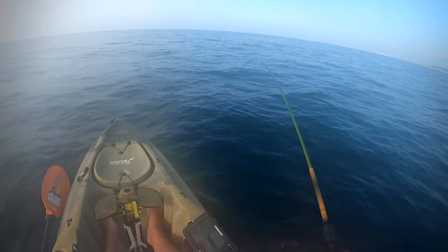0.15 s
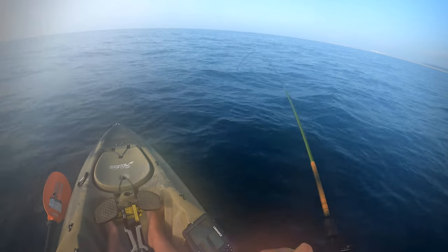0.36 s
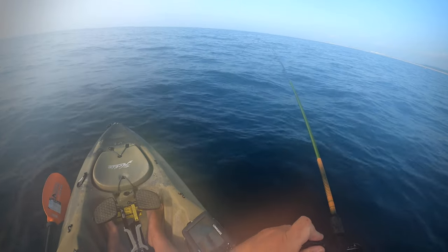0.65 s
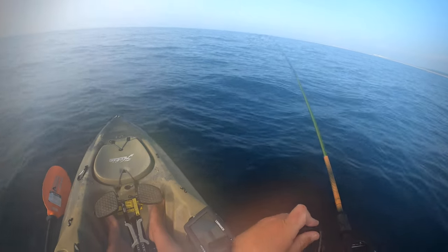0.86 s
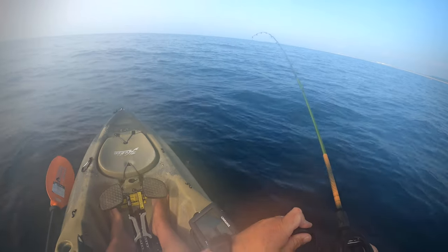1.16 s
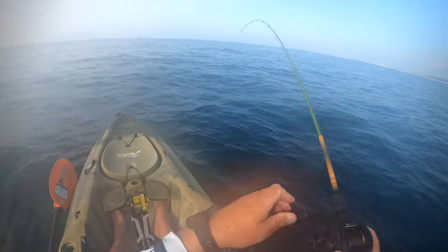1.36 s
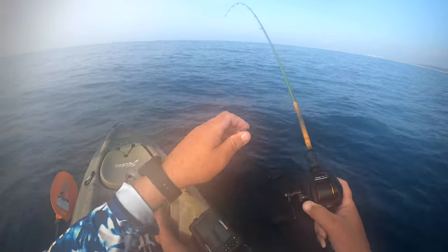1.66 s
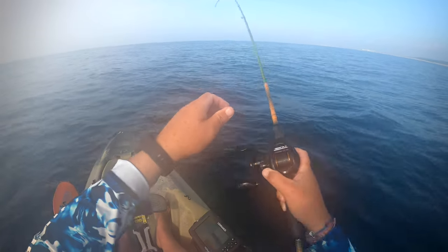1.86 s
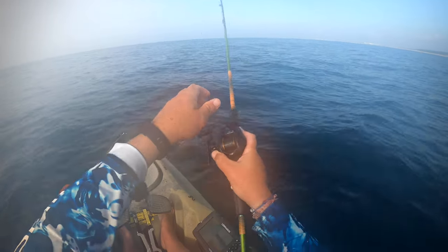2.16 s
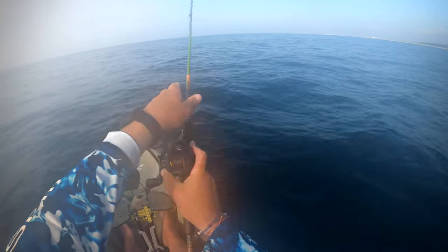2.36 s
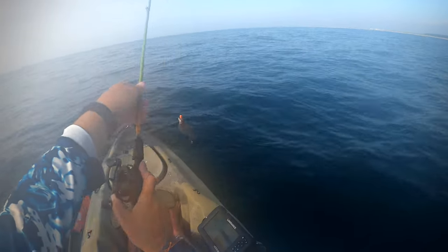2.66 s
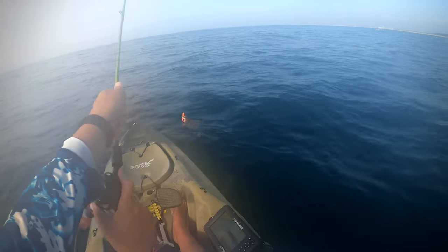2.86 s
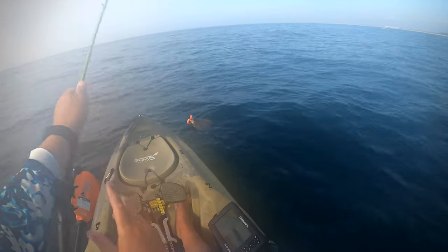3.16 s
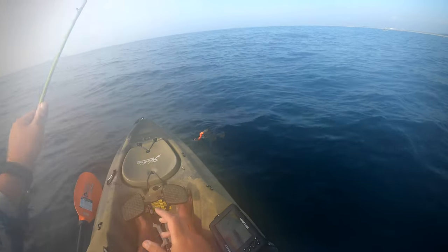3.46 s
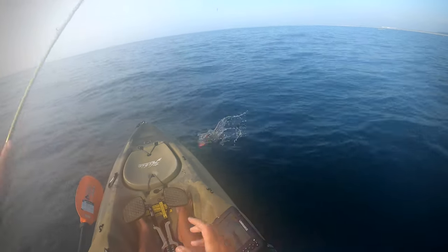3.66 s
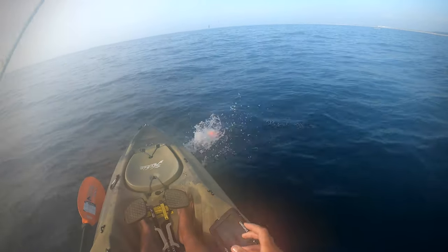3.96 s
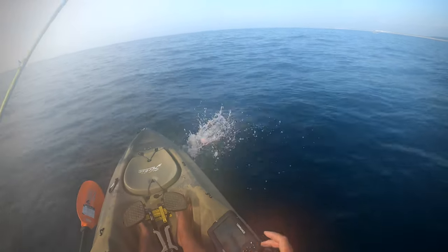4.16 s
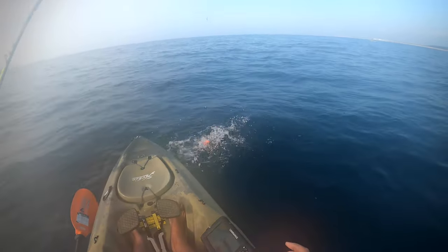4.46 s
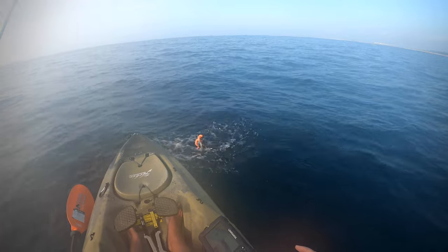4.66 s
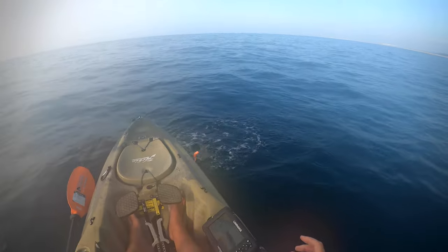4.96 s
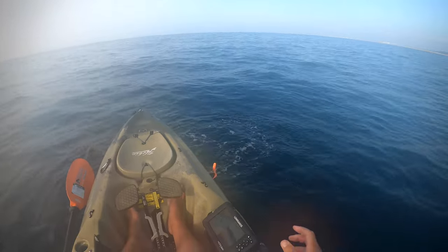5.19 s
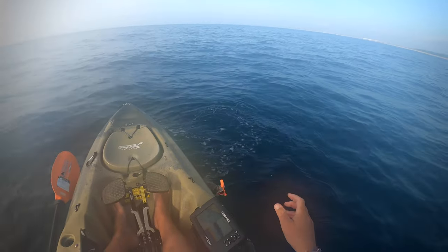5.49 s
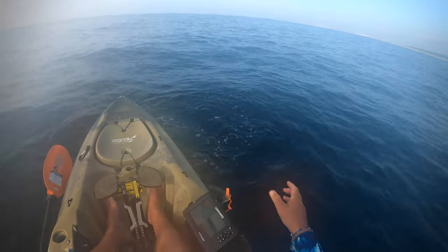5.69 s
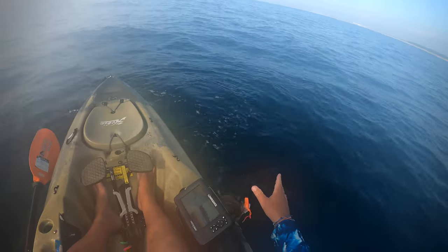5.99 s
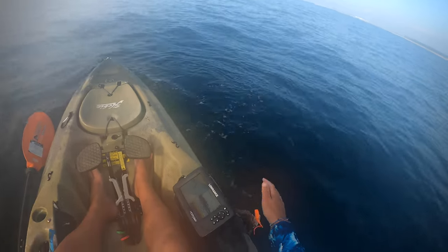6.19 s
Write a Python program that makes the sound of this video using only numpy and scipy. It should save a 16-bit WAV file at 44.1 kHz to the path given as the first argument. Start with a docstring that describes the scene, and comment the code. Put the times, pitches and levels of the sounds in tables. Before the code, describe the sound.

Reel whirr, rod ticks and hollow kayak knocks give way to a bubbling, spraying fish splash, then scattered plops, over a distant engine-like drone.

```python
"""On the water in a kayak: an angler winds in, lays the rod aside, and a hooked fish thrashes at the surface.
The reel whirrs as noise in its body resonances; ticks and hull knocks are struck modes that ring and die.
The splash is swelling, ringing bubbles under a noisy spray, then late drops and small drips.
A far engine-like rumble throbs because its hum tones beat; water, sleeves and light air add soft noise.
Two close microphone ports hear it all."""
import sys
import numpy as np
from scipy import signal
from scipy.fft import rfft, irfft, next_fast_len
from scipy.io import wavfile
from scipy.ndimage import uniform_filter1d

SR = 44100
rng = np.random.default_rng(int(sys.argv[2]) if len(sys.argv) > 2 else 0)


def wav_out(sig):
    """Save sig, one row per channel (or a flat mono array), as 16-bit PCM at SR to the path in sys.argv[1]."""
    wavfile.write(sys.argv[1], SR, np.round(np.clip(np.atleast_2d(sig).T, -1, 1) * 32767).astype(np.int16))


N = 279285

# Steady hum tones: pitch_hz, level_db (against the rumble noise), in_step_s (when in step with the first)
HUM_TONES = [(76.03, -2, 3.39), (72.91, -8, 3.402), (74.25, -12, 3.437), (70.9, -11, 3.383),
             (71.25, -11.5, 3.393), (145.8, -14, 3.39), (152.06, -16, 3.39), (94.8, -17, 3.39)]
# Far rumble over time: time_s, level_db
RUMBLE_LEVEL = [(0.0, -26.5), (1.23, -26), (2.4, -28), (3.33, -24), (3.6, -24.5), (4.05, -29.5),
                (4.2, -30.5), (4.5, -30), (4.83, -24.5), (5.15, -28), (5.6, -25), (6.33, -25)]
# Spectrum of the rumble noise: pitch_hz, level_db (per Hz)
RUMBLE_SPECTRUM = [(26, -40.5), (45, -10.5), (59, -6), (81, -9), (102, -6.5), (150, -7), (183, -11),
                   (230, -14), (254, -16.5), (288, -16.5), (512, -31), (595, -40), (900, -70), (1170, -94),
                   (1980, -120)]
# Soft wash of water round the hull: time_s, level_db
RUSTLE_LEVEL = [(0.0, -47), (0.6, -53.5), (0.95, -47), (1.12, -54), (1.36, -56.5), (1.5, -55), (1.8, -52.5),
                (2.1, -51), (2.4, -54.5), (2.5, -53.5), (2.62, -47.5), (2.8, -54), (2.98, -51.5),
                (3.14, -50.5), (3.2, -48), (3.55, -48), (4.8, -50.5), (4.92, -52), (5.5, -48.5),
                (5.83, -46), (6.33, -51)]
# Spectrum of the wash: pitch_hz, level_db (per Hz)
RUSTLE_SPECTRUM = [(350, -11), (600, -7), (961, -15), (1010, -6.5), (1090, -10.5), (1370, -10.5),
                   (1420, -11), (2020, -24.5), (4540, -41), (10000, -48.5), (13000, -72), (22000, -120)]
# Turns of the crank: start_s, end_s, level_db (at the start), sag_db_per_s (below zero it grows)
CRANK_TURNS = [(-.1, .45, -39.5, 6.5), (.47, .76, -55.5, -18), (.77, 1.13, -43.5, 33.5),
               (6.17, 6.4, -56, -10)]
# Resonances of the reel body: pitch_hz, width_hz, level_db
REEL_RESONANCES = [(1030, 830, -7), (1420, 300, 0), (1830, 420, -5), (2850, 360, -2.5), (3310, 410, -5),
                   (4100, 270, -16)]
# Gusts of light air on the ports: peak_s, peak_db, left_over_right_db
GUSTS = [(.48, -37, -2), (2.109, -20, 11), (2.33, -29, 5.5), (2.411, -22.5, 6), (2.8, -31, 3),
         (4.6, -40.5, -5), (5.62, -32, -5), (6.33, -38, -2)]
# Sleeves brushing as the arms move: peak_s, peak_db, width_s (rise and fall time)
SLEEVE_BRUSHES = [(.12, -49.5, 0.23), (0.84, -58, 0.072), (1.05, -67, 0.061), (1.63, -64, 0.16),
                  (1.873, -48, 0.026), (2.261, -65, 0.15), (2.62, -59.5, 0.085), (3.04, -53, 0.098),
                  (3.28, -59.5, 0.051), (3.5, -49.5, 0.13)]
# Spectrum of the cloth: pitch_hz, level_db (per Hz)
SLEEVE_SPECTRUM = [(900, -28.5), (1600, 4), (2800, -1), (4200, -6), (6500, -9.5), (9000, -15.5),
                   (11000, -33), (15000, -51)]
# Bubbles that whistle upward as they reach the surface: start_s, peak_db, start_hz, end_hz, length_s
CHIRP_BUBBLES = [(0.169, -33.5, 438, 452, .06), (3.86, -22, 780, 1156, 0.024),
                 (4.099, -18, 780, 1200, 0.024), (4.941, -35, 1760, 1950, 0.027),
                 (5.129, -39, 940, 1410, 0.017), (5.13, -49, 620, 1130, .045),
                 (5.295, -44, 2096, 2180, 0.03), (5.412, -52, 1130, 1460, 0.041)]
# Ticks of reel and rod: start_s, strength_db, centre_hz, crack_db (before a fixed cut in ticks)
TICK_EVENTS = [(0.1788, -21.5, 3080, -31), (0.182, -24, 1420, -46), (0.238, -29, 4400, -30),
               (0.2657, -22.5, 2980, -25.5), (0.394, -39, 2920, -41), (0.8142, -33, 1711, -27),
               (0.8593, -30, 1766, -31), (0.9205, -19.5, 2460, -59), (0.958, -41, 1588, -63),
               (1.004, -38, 3000, -53), (1.019, -52, 4400, -46), (1.113, -36.5, 1770, -40),
               (1.495, -35.5, 1330, -67), (1.84, -45, 3020, -55), (1.85, -35, 2050, -45),
               (1.8632, -37, 3500, -34.5), (1.8727, -28.5, 2580, -46), (1.8747, -24.5, 1640, -45),
               (1.882, -35, 1040, -53), (1.886, -39, 1700, -50), (1.894, -45, 1400, -41),
               (2.012, -33, 2050, -64), (2.026, -33, 2030, -66), (2.019, -50, 2200, -65),
               (2.036, -50, 2300, -66), (2.091, -39.5, 1980, -45.5), (2.15, -45, 2530, -65),
               (2.238, -37, 1500, -59), (2.244, -31, 1080, -63), (2.2543, -31, 2850, -63),
               (2.297, -45, 1520, -62), (2.361, -34, 1200, -47), (2.457, -44, 1358, -48),
               (2.465, -53, 2300, -58), (2.27, -48, 3700, -60), (2.266, -45, 1500, -61),
               (2.16, -48, 1200, -49.5), (2.839, -40.5, 1750, -44), (2.848, -48, 3400, -48),
               (2.859, -62, 4400, -50), (3.04, -52, 4000, -49), (3.072, -64, 4400, -43),
               (3.094, -48, 3000, -58), (3.2085, -60, 4450, -24.5), (3.2173, -21.5, 1640, -56),
               (3.2466, -40, 3120, -37), (3.264, -37, 1920, -46), (3.222, -50, 3500, -42),
               (3.252, -50, 4400, -38), (3.313, -54, 4400, -51), (3.375, -57, 4400, -50),
               (3.485, -57, 4380, -49)]
# Ringing modes of reel and rod: pitch_hz, level_db, t60_s (time to die by 60 dB)
TICK_RINGS = [(1050, -2, .022), (1330, 1, .03), (1700, 0, .02), (2150, 0, .018), (2600, 0, .015),
              (3050, 0, .015), (3700, -2, .012), (4500, -2, .01)]
# Gear knocking on the hull: start_s, strength_db, dulling_db_per_octave
HULL_KNOCKS = [(0.397, -35.5, -4.5), (0.409, -27.5, 5), (.428, -28.5, 5), (1.881, -34, -7.5),
               (1.9, -29.5, 3), (1.975, -29.5, -3.5), (1.981, -16.5, 6.5), (1.986, -30, 2),
               (1.9931, -19.5, 6), (1.999, -33, -1), (2.011, -23, 5.5), (2.029, -37, -3.5),
               (2.256, -42.5, -5.5), (4.823, -27, 6), (5.602, -28.5, -3.5), (5.871, -24, 2)]
# Ringing modes of the plastic hull: pitch_hz, level_db, t60_s
HULL_MODES = [(246, 5.5, 0.065), (300, -3.5, 0.034), (361, -1.5, 0.046), (460, 2, 0.029), (560, -9, 0.077),
              (666, -4, 0.036), (780, -9, 0.018), (1000, -12, 0.031), (1200, -4, 0.0078)]
# Gear dragged over the deck: peak_s, peak_db, rise_s, fall_s, centre_hz
DECK_SCRAPES = [(.41, -38.5, .015, 0.038, 420), (1.852, -53, 0.0054, 0.0088, 2600),
                (1.874, -35, .008, 0.0066, 2300), (1.89, -43, 0.0051, 0.038, 800),
                (1.978, -39.5, 0.0023, 0.023, 745), (2.014, -52, .002, 0.017, 1700),
                (2.03, -62, 0.0044, 0.019, 2200), (2.25, -51, 0.0089, .015, 1300),
                (3.234, -53, 0.011, 0.017, 5000), (5.615, -35, 0.0094, 0.028, 900)]
# Thrashing: time_s, large_bubbles_db (before the mix shares), spray_db
THRASHING = [(3.58, -57, -57), (3.636, -38, -32.5), (3.7, -33, -43), (3.73, -37.5, -43),
             (3.755, -27.5, -40), (3.84, -32, -34.5), (3.87, -25.5, -36), (3.92, -28.5, -34),
             (4.06, -27, -31.5), (4.11, -28, -32.5), (4.27, -26, -31.5), (4.33, -30.5, -35),
             (4.46, -34.5, -35.5), (4.6, -45, -33), (4.77, -55, -45.5), (4.8, -62, -75)]
# Thrown water falling back: peak_s, large_bubbles_db, small_bubbles_db (before the mix shares), spray_db
WATER_FALLS = [(4.784, -60, -53, -69), (4.835, -38, -31, -41), (4.966, -64, -35.5, -32),
               (5.066, -65, -47, -50)]
# Spectrum of the spray: pitch_hz, level_db (per Hz)
SPRAY_SPECTRUM = [(1760, -11), (3000, 1.5), (3490, -4), (4600, -5.5), (5570, -4.5), (7870, -13.5),
                  (8540, -8.5), (10000, -19.5), (14600, -31), (15600, -36)]
# Foam fizzing: time_s, level_db
FIZZ_LEVEL = [(3.58, -65), (3.66, -44), (3.78, -53), (4.01, -39), (4.29, -42), (4.74, -49.5), (5.1, -53),
              (6.33, -56)]
# Spectrum of the foam: pitch_hz, level_db (per Hz)
FIZZ_SPECTRUM = [(1470, -19), (2500, -8.5), (2870, -9), (4230, -14), (5050, -10), (7280, -9.5),
                 (8610, -10.5), (13700, -23.5), (15500, -35)]
# Tail slaps and falling drops, each trapping a bubble: start_s, peak_db, pitch_hz, t60_s, splat_db
PLOP_BUBBLES = [(3.6372, -22, 2780, 0.015, -36), (3.6517, -16.5, 930, 0.02, -39.0),
                (3.669, -22, 1150, 0.065, -34), (3.673, -20.5, 2700, 0.017, -40),
                (3.678, -15.5, 1900, 0.0092, -40), (3.692, -19, 1110, 0.022, -40.0),
                (3.7018, -20, 904, 0.063, -40), (3.708, -20, 1690, 0.031, -42.0),
                (3.732, -16.5, 665, .03, -40), (3.745, -17, 1600, .015, -23),
                (3.782, -20.5, 2770, .015, -36), (3.856, -32, 2860, 0.015, -16),
                (3.7515, -14, 400, 0.077, -21), (3.783, -15, 375, 0.093, -31),
                (3.81, -10.5, 1000, 0.014, -31), (3.8663, -13, 1120, 0.028, -27),
                (3.89, -18.5, 480, 0.041, -36), (3.897, -21, 355, 0.066, -45),
                (3.908, -18, 1200, 0.022, -37), (3.911, -24, 800, .02, -38), (4.037, -17, 1100, 0.04, -30),
                (4.246, -16, 1130, 0.014, -30), (4.354, -23, 1000, 0.033, -34),
                (3.907, -32, 714, 0.024, -40), (3.927, -15, 1070, 0.042, -35),
                (3.93, -20, 3240, 0.013, -35), (3.947, -17, 1045, 0.036, -25),
                (3.966, -18, 1140, 0.044, -13), (3.98, -15.5, 1085, 0.044, -19),
                (3.9855, -13.5, 560.0, 0.019, -34.0), (3.9992, -17.5, 2850, 0.015, -32),
                (4.0352, -12, 1620, 0.0096, -33.0), (4.095, -15.5, 1100, 0.043, -33),
                (4.117, -14, 1133, 0.033, -30), (4.145, -18, 940, 0.046, -29),
                (4.177, -19.5, 1600, 0.046, -33), (4.13, -21, 1000.0, 0.033, -11.5),
                (4.2025, -11, 1720, 0.014, -20), (4.245, -15, 780.0, 0.032, -31),
                (4.2825, -14, 1000, 0.023, -27), (4.329, -27, 680, 0.032, -37),
                (4.425, -30, 1600, 0.012, -30), (4.434, -17, 1680, .012, -17),
                (4.455, -28, 1030, 0.02, -30), (4.5041, -22, 1550, .015, -20),
                (4.5414, -26, 1250, 0.038, -32), (4.4431, -18, 840, 0.015, -31),
                (4.515, -34, 2620, 0.015, -15), (4.5822, -22.5, 1200, 0.038, -40),
                (4.604, -27, 1125, 0.078, -15), (4.6151, -18, 1670, 0.027, -35),
                (4.6274, -19.5, 3700, 0.0078, -16.5), (4.6458, -19, 2300, 0.0083, -24),
                (4.6672, -25.5, 1400, .02, -21), (4.675, -23, 3530, .012, -26),
                (4.7354, -37, 1580, 0.014, -27), (4.7611, -43, 2010, 0.01, -45),
                (4.772, -31, 2600, .012, -34), (4.807, -31, 1780, .015, -29),
                (4.7123, -25.5, 1790, 0.05, -15.5), (4.7827, -25, 1343, 0.039, -19),
                (4.822, -24.5, 1000, 0.04, -17.5), (4.8547, -32, 1930, .015, -34),
                (4.869, -43, 1900, .02, -39), (4.835, -22, 2160, 0.014, -41),
                (4.9386, -25.5, 2150, 0.015, -17.5), (4.966, -24, 1240, 0.02, -11.5),
                (4.969, -17, 1940, 0.02, -21), (4.99, -25, 2870, 0.012, -30), (4.961, -23, 1820, .02, -26),
                (5.0427, -32, 4330, 0.013, -49), (5.021, -34, 4300, .015, -48),
                (5.0555, -32, 4780, 0.012, -50), (5.166, -37, 3400, 0.011, -50),
                (5.325, -38, 4800, .012, -55), (5.617, -26.5, 2580, 0.018, -45),
                (5.0563, -40, 1034, 0.089, -41), (5.0599, -35, 1800, .02, -49),
                (5.085, -35, 1900, .015, -44), (5.1103, -39, 2220, .015, -52),
                (5.079, -36, 1030.0, 0.024, -55), (5.1491, -37, 2047, 0.053, -51.0),
                (5.1657, -30, 2980, 0.011, -27), (5.1921, -39, 2840, 0.014, -52),
                (5.2001, -40, 2170, .012, -52), (5.211, -36, 2490, .015, -46),
                (5.2633, -30, 1900, 0.018, -30), (5.2828, -27, 1084, 0.04, -55.0),
                (5.29, -38, 2300, .012, -50), (5.3056, -37, 1500, .015, -51),
                (5.3, -36, 2020, 0.048, -53.0), (5.3169, -23.5, 960, 0.022, -29.5),
                (5.343, -32, 2080, 0.013, -49.0), (5.373, -40, 2200, .012, -54),
                (5.3956, -41.5, 2550, .02, -52), (5.396, -45, 1300, .02, -55), (5.43, -38, 2400, 0.02, -50),
                (5.497, -38, 2000, .015, -50), (5.411, -36, 850.0, 0.03, -51.0),
                (5.432, -34, 706, 0.035, -49), (5.47, -40, 1000, 0.027, -57),
                (5.509, -39, 2658, 0.013, -28.5), (5.588, -36, 1840, 0.036, -34),
                (5.6022, -21, 3700, 0.0074, -21), (5.606, -27.5, 1096, 0.072, -45),
                (5.6172, -25, 1580, 0.021, -28), (5.611, -33, 2100, 0.014, -32),
                (5.6674, -44, 3000, .015, -55), (5.742, -34, 1200, 0.017, -50),
                (5.64, -39, 1460, .027, -33), (5.683, -40, 2010, .02, -53), (5.7053, -37, 2664, .015, -46),
                (5.728, -36.5, 1930, .02, -51), (5.7497, -27, 1150, 0.052, -55),
                (5.78, -41, 1924, .03, -55), (5.8137, -20.5, 2210, 0.025, -26),
                (5.815, -33, 3850, 0.018, -45), (5.817, -23, 1700, 0.017, -40),
                (5.822, -25, 1200, 0.015, -48), (5.8689, -20, 746, 0.07, -35),
                (5.876, -37, 950, 0.039, -46), (5.923, -31, 720, 0.021, -60),
                (5.8994, -47, 2380, .012, -55), (5.9454, -41, 1900, .02, -55),
                (6.0631, -42, 2300, .015, -42), (5.882, -35, 1150, 0.031, -50),
                (5.92, -34, 2300, 0.013, -61), (5.96, -31, 1660, 0.0067, -53.0),
                (5.988, -33.5, 976, 0.14, -48), (6.0188, -34.5, 2550, 0.024, -50),
                (6.02, -36, 1510, 0.071, -55), (6.032, -34.5, 3570, 0.016, -47)]
# Droplets pricking the surface and the deck: start_s, peak_db
DROPLET_PRICKS = [(3.6033, -20), (3.6232, -14.5), (3.6587, -15), (3.7816, -32), (3.812, -13.5),
                  (3.8363, -8), (3.9235, -17), (3.958, -9), (4.0731, -28), (4.1573, -24), (4.2021, -9),
                  (4.2662, -14), (4.5124, -21), (4.5526, -32), (4.594, -25), (4.6187, -12.5), (4.6872, -17),
                  (4.7663, -20), (4.7833, -18), (4.9688, -15),  (5.1902, -24), (5.6022, -16), (5.702, -26),
                  (5.9062, -33), (5.9773, -31), (6.0187, -20), (6.098, -33), (6.1444, -32), (6.1785, -31),
                  (6.2721, -30)]
# Left port against right port: pitch_hz, level_db, lag_rad (phase)
PORT_DIFFERENCE = [(100, 0, 0), (400, -1.5, 0.19), (1600, -0.46, 0.16), (2300, 0.9, 0.77),
                   (4100, -0.5, 1.27), (6400, -3, 1.62), (8500, -4, 1.3), (15000, -11, 2.3)]

HUM_THIRD_DB = -40   # a tone at three times the first hum pitch
RUMBLE_ALIKE = 1   # 1: both ports share the noise, apart from some treble
SIDE_TREBLE = .5   # the ports agree less in the treble
CALM_DB, GUST_RISE_S, GUST_FALL_S = -39.5, 0.024, .05
SLEEVES_REST_DB = -70.5
CRACK_RISE_S = 0.0012
TICK_CONTACT_S, KNOCK_CONTACT_S = .002, .008   # how fast the scuff of a blow dies
TICK_FOCUS_DB_PER_OCTAVE, TICK_RATTLE_DB = 25, -9.5
SCRAPE_OCTAVES = .55   # band reach to each side of the centre
FALL_RISE_S, FALL_FALL_S = 0.017, 0.02
GULPS_AT_DB, GULPS_SWING = -28.5, 1.13   # level when large bubbles stand at -25 dB; swing against theirs
SMALL_FOLLOWS_SPRAY = 0.62   # 0: small bubbles follow the large ones, 1: the spray
CHURN_DB = 3.0   # unevenness of the thrashing
GLIDE_OCTAVES, GLIDE_CYCLES = 0.25, 22.8   # average pitch gain; length before a random factor
PLOP_WOBBLE, PLOP_SWELL_CYCLES = 0.19, 0.21   # uneven loudness; speed of the swell
PLOP_RISE, PLOP_RISE_SPREAD = 0.033, 0.11   # share of extra cycles by t60; its random spread
SPATTER_DB, SPATTER_T60_S, SPATTER_OCTAVES = -15.5, 0.11, 0.21   # wet noise against each bubble's peak
DRIPS_FROM_S = 3.8
DRIPS_DB, DRIPS_SAG_DB_PER_S = -54, -0.5   # before the mix shares; a sag below zero grows
CUTOFF_HZ = 15500


def from_db(db):
    """Turn decibels into gain."""
    return 10 ** (np.asarray(db) / 20)


def rms_one(x):
    """Scale a sound to an average strength (rms) of 1."""
    return x / np.sqrt(np.mean(x ** 2) + 1e-20)


def in_time(rows):
    """Draw straight lines between the points of a curve, for every sample."""
    s, *columns = np.transpose(rows)
    return [np.interp(np.arange(N) / SR, s, c) for c in columns]


def while_on(rows):
    """Gain of one inside a curve's time span, with 20 ms fades just outside it."""
    t = np.arange(N) / SR
    inside_s = np.minimum(t - rows[0][0], rows[-1][0] - t)
    return np.clip(inside_s / .02 + 1, 0, 1)


def played(rows):
    """Gain from a level curve, silent away from its span."""
    return from_db(in_time(rows)[0]) * while_on(rows)


def strokes(rows):
    """Gain of sounds that start, change steadily in level and stop."""
    return sum(played([(start, db), (end, db - sag_db * (end - start))])
               for start, end, db, sag_db in rows)


def swell(s, peak_db, rise_s, fall_s):
    """Gain that grows to a peak and dies away, both exponentially."""
    t = np.arange(N) / SR - s
    return from_db(peak_db) * np.exp(np.where(t < 0, t / rise_s, -t / fall_s))


def drift(rate_hz):
    """Slow random wandering with a spread of 1: smoothed noise, made at every 40th sample."""
    r = np.exp(-80 * np.pi * rate_hz / SR)
    noise = rng.standard_normal(N // 40 + 2002)
    slow = signal.lfilter([1], [1, -2 * r, r * r], noise)[2000:]   # drop the filter's start
    return np.interp(np.arange(N) / 40, np.arange(len(slow)), rms_one(slow))


def coloured(x, spectrum):
    """Give white sound a spectrum by weighting each frequency; rms 1."""
    size = next_fast_len(N)
    hz, level_db = np.transpose(spectrum)
    log_hz = np.log(np.arange(size // 2 + 1) * SR / size + 1)
    weight = from_db(np.interp(log_hz, np.log(hz), level_db))
    return rms_one(irfft(rfft(x, size) * weight, size)[..., :N])


def spread(alike):
    """Two noises, one per port, that share a part, less of it in the treble."""
    mid, side = rng.standard_normal((2, N))
    alike = np.clip(alike, 0, 1)
    treble = np.diff(side, n=2, prepend=[0, 0]) / 2
    apart = np.sqrt(1 - alike) * side + SIDE_TREBLE * treble
    return np.sqrt(1 + alike) * mid + apart * [[1], [-1]]


def grains(per_s, spread_db):
    """Clicks at random moments with uneven sizes and signs."""
    sizes = from_db(spread_db * np.minimum(rng.exponential(1, N), 4)) * rng.choice([-1, 1], N)
    return sizes * (rng.random(N) < per_s / SR)


def ring(clicks, hz, t60):
    """A resonance: each unit click starts a dying sine of height about 1."""
    r, w = from_db(-60 / (t60 * SR)), 2 * np.pi * hz / SR
    return signal.lfilter([0, np.sin(w)], [1, -2 * r * np.cos(w), r * r], clicks + 1e-18)


def add(out, s, sound):
    """Mix a short sound in at a time."""
    at = int(s * SR)
    out[at:at + len(sound)] += sound[:N - at]


def bandpass(x, order, band_hz):
    """Keep only the part of a sound between two frequencies."""
    return signal.sosfilt(signal.butter(order, band_hz, "band", fs=SR, output="sos"), x)


def cracks(rows, low_hz, high_hz, t60):
    """A dying burst of band noise at each event, its peak set by the last column."""
    t = np.arange(2500) / SR
    shape = (1 - np.exp(-t / CRACK_RISE_S)) * from_db(-60 * t / t60)
    burst = np.zeros(N)
    for row in rows:
        add(burst, row[0], from_db(row[-1]) * shape)
    noise = bandpass(burst * spread(0.99), 3, [low_hz, high_hz])
    passed = np.sqrt((high_hz - low_hz) / (SR / 2))   # share of white noise inside the band
    return noise / passed / 2   # peaks are about twice the rms


def blows(s, peak_db, contact_s):
    """Each blow is a sharp touch followed by a short scuff of dying noise."""
    out, t = np.zeros(N), np.arange(1500) / SR
    scuff = .045 * rng.standard_normal((len(s), len(t))) * np.exp(-t / contact_s)
    scuff[:, 0] = 1   # the touch
    for at, level_db, rub in zip(s, peak_db, scuff):
        add(out, at, from_db(level_db) * rub)
    return out


def bubbles(gain, low_hz, high_hz, per_s, cycles, tilt_db):
    """Bubbles come in clumps, swell quickly and ring on, at 16 log-spaced pitches; rms follows the gain."""
    clumps = from_db(3 * drift(25))
    born = grains(per_s * clumps, 1.3)
    dealt, rings = rng.integers(0, 16, N), 0   # which pitch each bubble gets
    for k, hz in enumerate(np.geomspace(low_hz, high_hz, 16)):
        soft = ring(born * (dealt == k), hz, 3.3 / hz) * hz / low_hz   # a short first ring rounds the onset
        rings = rings + from_db(tilt_db * k / 15) * ring(soft, hz, cycles / hz)
    even = np.sqrt(uniform_filter1d(rings ** 2, 3000) + 1e-3 * np.mean(rings ** 2))
    return gain * rings / even


def gliding(gain, low_hz, high_hz, per_s):
    """Overlapping bubbles of uneven size swell, slide up in pitch and fade; the gain shapes their sum."""
    out = np.zeros(N)
    for when, pitch, size, span, slide in rng.random((int(per_s * N / SR), 5)):
        hz = low_hz * (high_hz / low_hz) ** pitch
        samples = int(GLIDE_CYCLES * (0.31 + span) * SR / hz)
        part = np.arange(samples) / samples   # runs from 0 to 1 through the bubble
        rising_hz = hz * 2 ** (GLIDE_OCTAVES * 2 * slide * part)
        shape = part * np.exp(-5.0 * part) * np.cos(np.pi * part / 2)
        sine = np.sin(2 * np.pi * np.cumsum(rising_hz) / SR)
        add(out, when * N / SR, from_db(-16 * size) * shape * sine)
    return gain * rms_one(out)


def rumble():
    """Low far noise and hum tones that throb as they beat, plus a wavering third multiple."""
    t = np.arange(N) / SR
    first_hz = HUM_TONES[0][0]
    tones = sum(from_db(db) * np.cos(2 * np.pi * (first_hz * t + (hz - first_hz) * (t - s)))
                for hz, db, s in HUM_TONES)
    third_phase = 2 * np.pi * np.cumsum(3 * first_hz + 1.53 * drift(2.98)) / SR
    wavering = from_db(HUM_THIRD_DB + 2.5 * drift(4)) * np.sin(third_phase)
    noise = from_db(1.07 * drift(6.5)) * coloured(spread(RUMBLE_ALIKE), RUMBLE_SPECTRUM)
    return np.sqrt(2) * wavering + played(RUMBLE_LEVEL) * (np.sqrt(2) * tones + noise)


def rustle():
    """Soft noise of water round the hull, partly from all round, with small lapping grains."""
    flutter = from_db(.8 * drift(14))
    water = spread(0.7) + .5 * rms_one(grains(150, 7.4))
    return played(RUSTLE_LEVEL) * flutter * coloured(water, RUSTLE_SPECTRUM)


def reel():
    """Gear teeth rub as dense noise in the resonances of the reel body."""
    teeth = (rng.standard_normal(N) + 0.48 * rms_one(grains(400, 3.4))) * from_db(0.76 * drift(30))
    body = 0
    for k, (hz, width_hz, level_db) in enumerate(REEL_RESONANCES):
        resonance = rms_one(ring(teeth, hz, 2.9 / width_hz)) * np.sqrt(width_hz)
        body = body + (-1) ** k * from_db(level_db) * resonance
    return strokes(CRANK_TURNS) * rms_one(bandpass(body, 2, [800, 4500]))


def wind():
    """Low lumpy noise, partly its own at each port, lifting in short gusts."""
    low = bandpass(spread(0.65), 2, [18, 70])
    gusts = sum(swell(s, db + pan_db / 2 * np.array([[1], [-1]]), GUST_RISE_S, GUST_FALL_S)
                for s, db, pan_db in GUSTS)
    return (from_db(CALM_DB + 3.5 * drift(12)) + gusts) * rms_one(low)


def sleeves():
    """Cloth on cloth: fine dense grains in short swells."""
    fibres = spread(0.3) + 0.45 * rms_one(grains(730, 3.8) * from_db(4.5 * drift(22)))
    swells = sum(swell(s, db, width, width) for s, db, width in SLEEVE_BRUSHES)
    brushing = from_db(SLEEVES_REST_DB) + swells * from_db(2.3 * drift(18))
    return brushing * coloured(fibres, SLEEVE_SPECTRUM)


def chirps():
    """A bubble near the surface whistles: a sine that swells, glides up and fades."""
    out = np.zeros(N)
    for s, peak_db, start_hz, end_hz, length_s in CHIRP_BUBBLES:
        t = np.arange(int(length_s * SR)) / SR
        cycles = start_hz * t + (end_hz - start_hz) * t ** 2 / (2 * length_s)
        add(out, s, from_db(peak_db) * np.sin(np.pi * t / length_s) * np.sin(2 * np.pi * cycles))
    return out


def ticks():
    """Each tick strikes the modes near its centre hardest, cracks in the treble and leaves a loose rattle."""
    s, tick_db, centre_hz, _ = np.transpose(TICK_EVENTS)
    luck_octaves_db = rng.normal(0, 0.45, (len(s), len(TICK_RINGS)))
    out = 0
    for k, (hz, level_db, t60) in enumerate(TICK_RINGS):
        off_centre_db = TICK_FOCUS_DB_PER_OCTAVE * np.abs(np.log2(hz / centre_hz))
        strength_db = tick_db + level_db - off_centre_db + luck_octaves_db[:, k]
        out = out + ring(blows(s, strength_db, TICK_CONTACT_S), hz, t60) * (-1) ** k
    rattle = from_db(TICK_RATTLE_DB) * cracks(TICK_EVENTS, 1800, 6500, t60=0.031)
    return out + from_db(-5.5) * cracks(TICK_EVENTS, 2800, 10500, t60=0.013) + rattle


def knocks():
    """Blows set the hull modes ringing; more dulling leaves the higher modes weaker."""
    s, knock_db, dull_db = np.transpose(HULL_KNOCKS)
    luck_db, out = rng.normal(0, 1.5, (len(s), len(HULL_MODES))), 0
    for k, (hz, level_db, t60) in enumerate(HULL_MODES):
        octaves_up = np.log2(hz / HULL_MODES[0][0])
        strength_db = knock_db + level_db - dull_db * octaves_up + luck_db[:, k]
        out = out + ring(blows(s, strength_db, KNOCK_CONTACT_S), hz, t60) * (-1) ** k
    return out


def scrapes():
    """Dragged gear slips unevenly: dense noise in a wide band round each centre."""
    slips, out = rms_one(rng.standard_normal(N) + 1.7 * rms_one(grains(640, 6.8))), 0
    for s, peak_db, rise_s, fall_s, hz in DECK_SCRAPES:
        band_hz = hz * 2 ** (SCRAPE_OCTAVES * np.array([-1, 1]))
        out = out + swell(s, peak_db, rise_s, fall_s) * rms_one(bandpass(slips, 2, band_hz))
    return out


def splash():
    """Gulps of air, large and small bubbles under a wide spray of droplets."""
    large_db, spray_db = in_time(THRASHING)
    small_db = large_db + np.clip(SMALL_FOLLOWS_SPRAY, 0, 1) * (spray_db - large_db)
    thrown = while_on(THRASHING) * from_db([large_db, small_db, spray_db])
    falling = [sum(swell(row[0], row[k], FALL_RISE_S, FALL_FALL_S) for row in WATER_FALLS)
               for k in (1, 2, 3)]
    large, small, spray = thrown + falling
    deep = from_db(GULPS_AT_DB) * (large / from_db(-25.0)) ** GULPS_SWING
    specks = .7 * rms_one(np.array([grains(900, 4.5), grains(900, 4.5)]))
    droplets = spread(1.0) * from_db(3.7 * drift(32)) + specks
    # uneven slaps, drawn separately for each bubble size
    deep, large, small = (gain * from_db(CHURN_DB * drift(19)) for gain in (deep, large, small))
    return (bubbles(deep, 316, 740, per_s=200., cycles=18.0, tilt_db=3.0)
            + gliding(0.72 * large, 597, 1296, per_s=110.)
            + gliding(0.55 * small, 1345, 3180, per_s=260.)
            + bubbles(0.57 * large, 773, 1360, per_s=330.0, cycles=24.0, tilt_db=5.0)
            + bubbles(0.96 * small, 1554, 3440, per_s=1500., cycles=17.0, tilt_db=-15.0)
            + spray * coloured(droplets, SPRAY_SPECTRUM))


def fizz():
    """Tiny bubbles burst all round: smooth hiss with a few pricks."""
    pricks = np.array([grains(250, 4.7), grains(300, 4.0)])
    foam = spread(0.93) + 0.93 * rms_one(pricks)
    return played(FIZZ_LEVEL) * coloured(foam, FIZZ_SPECTRUM)


def plops():
    """A trapped bubble swells fast and rings unevenly, its pitch more often rising; the impact splats."""
    out, t = np.zeros(N), np.arange(4000) / SR
    luck = rng.standard_normal((len(PLOP_BUBBLES), 2, len(t)))
    for (s, peak_db, hz, t60, _), (shake, wet) in zip(PLOP_BUBBLES, luck):
        bend = PLOP_RISE + PLOP_RISE_SPREAD * shake[0]   # below zero the pitch falls
        cycles = hz * t * (1 + bend * t / t60)
        shape = (1 - np.exp(-t * hz / PLOP_SWELL_CYCLES)) * from_db(-60 * t / t60)
        wobble = 1 + PLOP_WOBBLE * rms_one(uniform_filter1d(shake, int(1.5 * SR / hz)))
        tone = shape / shape.max() * wobble * np.sin(2 * np.pi * cycles)
        band_hz = hz * 2 ** (SPATTER_OCTAVES * np.array([-.5, 1]))
        spatter = from_db(SPATTER_DB - 60 * t / SPATTER_T60_S) * rms_one(bandpass(wet, 1, band_hz)) / 2
        add(out, s, from_db(peak_db) * (tone + spatter))
    splats = cracks(PLOP_BUBBLES, 1040, 3680, t60=0.017)
    return out + splats + cracks(DROPLET_PRICKS, 2100, 8600, t60=0.0094)


def drips():
    """Small bubbles as water runs off, some gliding, growing very slightly in level."""
    running = strokes([(DRIPS_FROM_S, N / SR, DRIPS_DB, DRIPS_SAG_DB_PER_S)])
    ringing = bubbles(0.39 * running, 915, 2940, per_s=150.0, cycles=35.0, tilt_db=14.0)
    return ringing + gliding(.6 * running, 605, 2760, per_s=78.0)


def ports(pair):
    """The left port is shadowed in the high treble and hears sound a little later."""
    size = next_fast_len(N + 64)
    log_hz = np.log(np.arange(size // 2 + 1) * SR / size + 1)
    hz, level_db, lag_rad = np.transpose(PORT_DIFFERENCE)
    level = from_db(np.interp(log_hz, np.log(hz), level_db))
    shadow = level * np.exp(-1j * np.interp(log_hz, np.log(hz), lag_rad))
    return np.array([irfft(rfft(pair[0], size) * shadow, size)[:N], pair[1]])


def scene():
    """Near sounds reach both ports almost alike; the surrounding noise partly differs."""
    near = reel() + chirps() + ticks() + knocks() + scrapes() + splash() + plops() + drips()
    return ports(near + rumble() + rustle() + wind() + sleeves() + fizz())


def record(dry):
    """A steep low-pass filter cuts the top treble."""
    return signal.sosfilt(signal.ellip(10, .5, 70, CUTOFF_HZ, fs=SR, output="sos"), dry)


dry = scene()
out = record(dry)
wav_out(out)
```